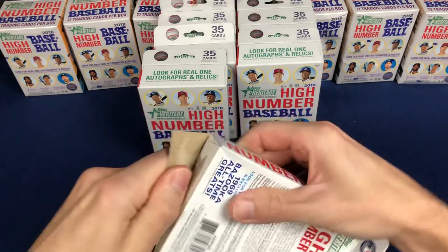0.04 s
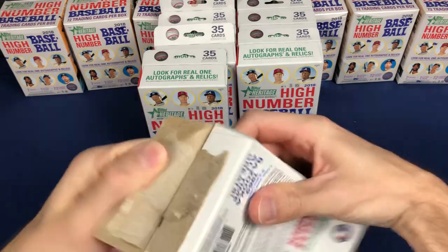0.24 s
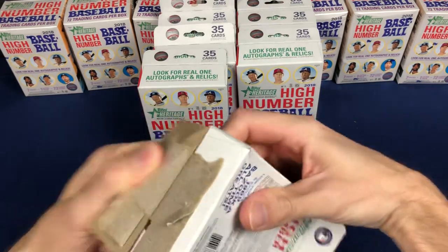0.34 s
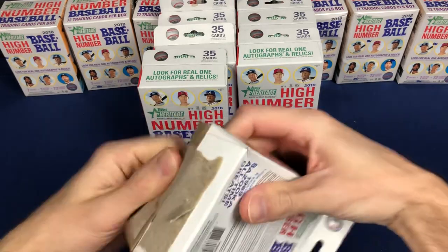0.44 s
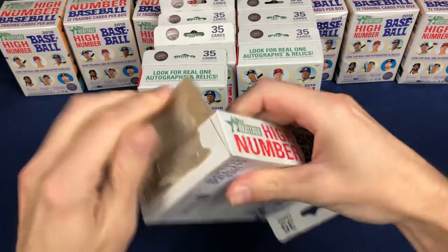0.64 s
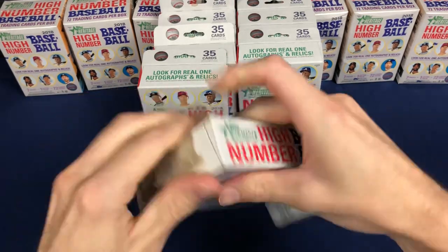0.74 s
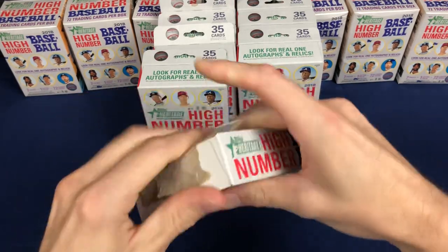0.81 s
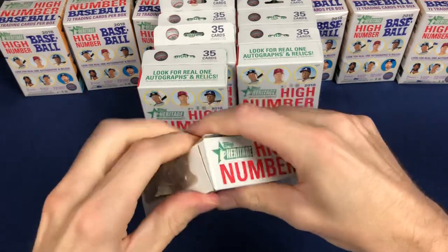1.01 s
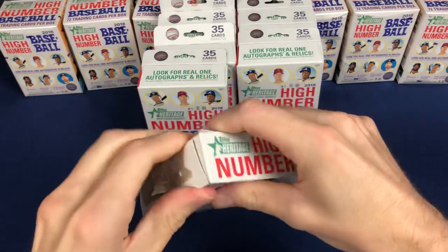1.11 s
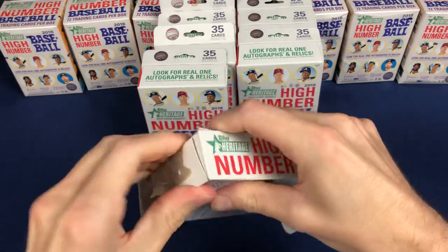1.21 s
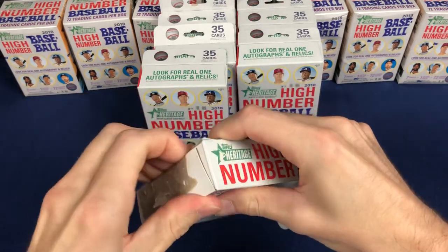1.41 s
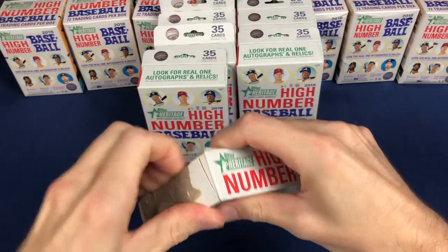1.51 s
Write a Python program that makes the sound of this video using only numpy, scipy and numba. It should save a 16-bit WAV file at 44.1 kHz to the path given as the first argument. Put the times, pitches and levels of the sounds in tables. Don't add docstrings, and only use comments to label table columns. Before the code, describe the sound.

Thin card tears in a loud, brief crackling rip, followed by softer creases, knocks and finger slides

```python
import sys
import numpy as np
from scipy import signal
from scipy.fft import rfft, irfft
from scipy.io import wavfile
from scipy.ndimage import uniform_filter1d
from numba import njit

SR = 44100
rng = np.random.default_rng(int(sys.argv[2]) if len(sys.argv) > 2 else 0)


def file_out(sig):
    cols = np.atleast_2d(sig).T
    lim = np.clip(cols, -1, 1)
    pcm = np.round(lim * 32767).astype(np.int16)
    wavfile.write(sys.argv[1], SR, pcm)


def rack_gain(trim_db):
    fader = np.asarray(trim_db, float)
    return 10 ** (fader / 20)


N = 68355

# [f/Hz, level per Hz/dB]
AIR_SPECTRUM = [(18, -18), (30, 0.5), (199, -11), (632, -19), (889, -2), (3980, -77), (5450, -27),
                (14000, -32), (16000, -44)]
# [loudest moment t/s, rise/s, fall/s, level/dB, centre f/Hz]
SLIDES = [(.0, 0.014, 0.066, -44, 3430), (0.041, 0.032, 0.016, -42.5, 4500),
          (.09, 0.015, 0.087, -48.5, 3380), (.385, 0.053, 0.049, -45.5, 497),
          (0.447, 0.028, 0.13, -45, 3620), (0.523, 0.013, 0.033, -50, 1800), (.53, .02, .03, -54, 9000),
          (.59, 0.035, 0.043, -47.5, 3360), (0.646, 0.038, 0.046, -40, 3450), (.645, .03, .07, -50, 400),
          (.66, .03, .03, -50, 10000), (.725, 0.037, 0.034, -59, 1500), (.775, 0.0082, 0.092, -50, 2460),
          (0.837, 0.0072, 0.0037, -29.5, 4540), (.865, 0.03, 0.08, -50, 5000),
          (.85, 0.14, 0.074, -45, 3730), (0.942, 0.019, 0.023, -37.5, 6200),
          (0.961, 0.0091, 0.024, -43, 5000), (1.002, 0.03, 0.027, -50, 4860),
          (1.046, 0.042, 0.068, -43, 7500), (1.088, 0.026, 0.033, -53, 4500),
          (1.12, .02, 0.018, -52.5, 4000), (1.165, 0.02, 0.066, -54, 3700),
          (1.222, 0.018, 0.008, -42, 3000), (1.25, 0.056, 0.1, -49.5, 2750),
          (1.359, 0.011, 0.075, -64, 3020), (1.474, 0.038, 0.044, -47, 5500),
          (1.505, 0.041, 0.076, -49, 4300)]
# [middle t/s, half length/s, level/dB, f/Hz]
SINGING_FLAPS = [(.008, .015, -57.5, 3380), (0.031, .015, -58.5, 3720), (.255, .03, -37, 3330),
                 (0.45, .03, -49.5, 3550), (0.8384, .005, -35, 3017), (1.132, .003, -51.5, 3400),
                 (0.86, 0.025, -54, 2800), (1.084, 0.011, -58, 1028), (1.263, 0.042, -59.5, 1670),
                 (1.257, 0.05, -57, 2446), (1.493, 0.039, -57, 4930)]
# [t/s, peak level/dB, f/Hz, ring T60/s, push length/s]
PANEL_KNOCKS = [(0.013, -48, 118, 0.04, 0.0059), (0.019, -44, 314, 0.024, 0.016),
                (0.042, -45, 207, 0.024, 0.0045), (0.083, -45, 263, 0.023, 0.004),
                (.09, -48, 463, .02, .008), (0.178, -41.5, 930, .012, 0.0021),
                (0.2129, -34.5, 1753, 0.022, 0.0077), (0.214, -31.5, 920, 0.014, 0.0023),
                (.3155, -35.5, 810, 0.036, 0.0013), (.321, -34, 810, 0.011, 0.00087),
                (0.3268, -20, 1798, 0.011, 0.0023), (.3282, -26, 837, 0.021, 0.0022),
                (0.329, -33, 320, 0.032, .004), (0.34, -34, 368, 0.05, 0.0054),
                (.355, -37.5, 508, 0.028, 0.0035), (0.333, -42.5, 185.5, 0.11, 0.019),
                (0.3428, -31.5, 1102, 0.026, 0.006), (0.457, -44, 327, 0.027, .008),
                (.58, -50, 755, 0.026, 0.0052), (0.586, -41.5, 1114, 0.03, 0.0083),
                (.628, -44, 410, 0.028, 0.0082), (.636, -36.5, 877, 0.018, 0.0068),
                (.646, -44.5, 393, 0.025, .012), (.6715, -47, 860, 0.012, 0.0037),
                (.678, -48, 372, 0.022, 0.0051), (.708, -47, 800, 0.012, .002),
                (.711, -49, 280, 0.023, 0.0046), (0.7427, -28, 780, 0.01, 0.0062),
                (0.743, -39.5, 1720, 0.011, .003), (.769, -44, 855, 0.02, 0.0058),
                (0.7962, -37.5, 233, 0.023, 0.0022), (0.8134, -24, 1010, 0.016, 0.0048),
                (0.815, -46, 158, 0.049, 0.019), (0.8277, -39, 1128, 0.027, 0.0042),
                (0.841, -43.5, 346, 0.064, 0.015), (1.163, -50, 397, 0.014, 0.0037),
                (1.172, -45, 366, 0.026, .004), (1.1725, -44, 760, .01, 0.0022),
                (1.175, -47.5, 560, 0.015, 0.0018), (1.181, -42.5, 723, 0.015, 0.0037),
                (1.2162, -42, 1714, 0.025, 0.0055)]
# [frequency ratio, level/dB]
PANEL_PARTNERS = [(1, 0), (1.11, -11), (.8, -14), (1.6, -13)]
# [t/s, peak level/dB, centre f/Hz, spread/octaves, length/s]
CREASE_SNAPS = [(.0825, -39, 3870, 1.7, 0.004), (.127, -46, 6000, 0.89, 0.0018),
                (.1375, -57, 6000, .6, 0.00092), (.5673, -35.5, 12600, .45, 0.0024),
                (.576, -36.5, 10100, 0.15, 0.0037), (.6705, -29, 1450, 0.86, 0.002),
                (.694, -36, 1600, 0.89, 0.00094), (.7055, -37, 1360, 1.17, 0.0025),
                (.7155, -52.5, 2800, 1.1, 0.0026), (.7385, -45, 4000, 1.5, 0.0027),
                (.7428, -36, 4200, 1.2, 0.0022), (.7675, -34, 5500, 1.1, 0.0015),
                (.7913, -33.5, 5440, 0.64, 0.0014), (.8132, -30, 4500, 0.7, 0.0034),
                (.8158, -23, 5200, 0.34, 0.00087), (.8285, -24.5, 5030, 0.72, .002),
                (.837, -23, 6000, 0.45, 0.0025), (1.1278, -39, 3800, 0.51, .0015),
                (1.149, -42, 5200, 1.1, 0.0017), (1.1595, -41, 5000, 0.52, 0.0021),
                (1.172, -46, 5500, 0.43, 0.0022), (1.183, -47.5, 5000, .8, 0.0016),
                (1.334, -43, 4750, 1, 0.0052), (1.3985, -49, 3500, 2, 0.003),
                (1.4245, -49, 3000, 2.2, 0.003)]
# [t/s, peak level/dB, centre f/Hz, spread/octaves, length/s]
TEAR_SNAPS = [(.1755, -33.5, 10000, 1.2, 0.002), (.192, -30, 9800, 0.4, .0007),
              (.2007, -15, 4500, 1.1, .001), (.2045, -21, 5000, 1.2, .002),
              (.2105, -15.5, 8100, 0.9, 0.0023), (.261, -13, 7000, 0.88, 0.0027),
              (.2685, -30, 4500, 1, .0015), (.2597, -11.5, 8050, 0.35, 0.00038),
              (.2722, -13.5, 8500, 0.54, 0.00046), (.2815, -19, 7400, 0.51, 0.0019),
              (.290, -13.5, 5950, 0.2, 0.00059), (.293, -20, 6100, 0.77, 0.0016),
              (.3028, -18.5, 6540, 1.1, 0.00056), (.3087, -20, 6070, 0.45, 0.0011),
              (.3106, -26, 7500, .4, 0.0015), (.3143, -15, 2800, .9, .0005),
              (.3193, -19.5, 5500, 0.88, 0.00091), (.3262, -2.5, 4960, 0.6, 0.00035),
              (.3263, -4, 10700, 0.2, 0.00038), (.3372, -21, 6000, 0.7, 0.0011),
              (.3398, -12.5, 4420, 1.46, 0.0013), (.3413, -14.5, 3500, 1.57, 0.00076),
              (.3545, -16, 4000, 1, 0.001), (.364, -27.5, 6940, 1.2, 0.0015)]
# [t/s, level/dB, centre of fibre pitch f/Hz]
TEAR_EFFORT = [
    (.165, -58.5, 6950),
    (0.197, -39.5, 8300),
    (0.204, -24.5, 6040),
    (0.222, -32, 7300),
    (0.264, -24.5, 6040),
    (.282, -26, 6460),
    (0.285, -36, 5930),
    (0.343, -33.5, 4630),
    (.39, -52, 4050),
]

AIR_DB, HUM_DB, HUM_HZ, HUM_WIDTH_HZ = -66, -68.5, 122.7, 42
SLIDE_OCTAVES, SLIDE_CYCLES, SLIDE_SCATTER_DB, SLIDE_PATCHY_DB = 1.6, 4.51, 1, 1.3
SLIDE_BODY_DB, SLIDE_BODY_HZ = -9, 334
SING_CYCLES, SING_SPREAD = 13.5, 0.029
SNAP_CYCLES, SNAP_SCATTER_DB = 2.5, 2.5
TEAR_OCTAVES, TEAR_CYCLES, TEAR_SCATTER_DB, TEAR_PATCHY_DB = 0.75, 3.83, 2.8, 1.2
TEAR_AIR_DB, TEAR_AIR_HZ, TEAR_BODY_DB, TEAR_BODY_HZ = -4.5, 11400, -16, 1130
TEAR_LOW_HZ, CARD_LOW_HZ = 156, 72.4
ROOM_T60_S, ROOM_DB, ROOM_LOW_HZ, ROOM_TOP_HZ = 0.24, -13.5, 437, 9000
PANEL_ROOM_DB = -7
MIC_LOW_HZ, MIC_TOP_HZ = 48, 15900


@njit
def ring(n, start, turn, fade, size):
    y = np.zeros(n)
    for k in range(len(start)):
        step = np.exp(-fade[k] + 1j * turn[k])
        swing = 1.5 * size[k] + 0j
        attack_step = np.exp(-turn[k] / 1.5)
        attack = 1.
        for i in range(max(start[k], 0), min(n, start[k] + int(6 / fade[k]))):
            y[i] += swing.imag * (1 - attack)
            swing *= step
            attack *= attack_step
    return y


def grains(t, hz, cycles, size):
    t, hz, cycles, size = (np.ravel(v) * 1. for v in np.broadcast_arrays(t, hz, cycles, size))
    start = (t * SR).astype(np.int64)
    fade = np.log(1000) * hz / (3 * cycles * SR)
    return ring(N, start, 2 * np.pi * hz / SR, fade, size)


def chance(count, scatter_db):
    place, pitch, sign, luck = rng.random((count, 4)).T
    hz = 150 * 115 ** pitch
    scatter = rack_gain(-scatter_db * np.log(1 - .985 * luck))
    return place, hz, np.sign(sign - .5) * scatter * np.sqrt(hz / 4000)


def hump(hz, centre_hz, octaves):
    return np.exp(-(np.log2(hz / centre_hz) / octaves) ** 2 / 2)


def band(x, hz, width_hz):
    return signal.lfilter(*signal.iirpeak(hz, hz / width_hz, fs=SR), x)


def low_cut(x, hz, order=2):
    return signal.sosfilt(signal.butter(order, hz, "high", fs=SR, output="sos"), x)


def walk(rate):
    hold = int(SR / rate)
    levels = np.repeat(rng.standard_normal(N // hold + 1), hold)
    return 0.93 * uniform_filter1d(levels, hold)[:N]


def room_floor():
    f = np.fft.rfftfreq(N, 1 / SR) + 1
    hz, db = np.array(AIR_SPECTRUM).T
    colour = rack_gain(np.interp(np.log(f), np.log(hz), db))
    air = irfft(rfft(rng.standard_normal(N)) * colour, N)
    hum = band(band(rng.standard_normal(N), HUM_HZ, HUM_WIDTH_HZ), HUM_HZ, HUM_WIDTH_HZ)
    return rack_gain(AIR_DB + 2 * walk(2.5)) * air / air.std() + rack_gain(HUM_DB) * hum / hum.std()


def room_tail(sent):
    t = np.arange(SR // 2) / SR
    noise = signal.lfilter(*signal.butter(1, ROOM_TOP_HZ, fs=SR), rng.standard_normal(len(t)))
    tail = low_cut(noise, ROOM_LOW_HZ) * rack_gain(-60 * t / ROOM_T60_S)
    tail = tail * (t > .004)
    return rack_gain(ROOM_DB) * signal.fftconvolve(sent, tail / np.sqrt(np.sum(tail ** 2)))[:N]


def slides():
    place, hz, size = chance(count=30000, scatter_db=SLIDE_SCATTER_DB)
    t = place * N / SR
    body = rack_gain(SLIDE_BODY_DB) * hump(hz, SLIDE_BODY_HZ, 0.51)
    power = 0
    for peak, rise, fall, db, centre in SLIDES:
        swelling = np.exp(-2 * ((peak - t) / rise) ** 2)
        fading = np.exp(-2 * (np.abs(t - peak) / fall) ** 1.12)
        swell = np.where(t < peak, swelling, fading)
        power = power + (rack_gain(db) * swell * (hump(hz, centre, SLIDE_OCTAVES) + body)) ** 2
    size = .5 * size / np.sqrt(np.mean(size ** 2)) * np.sqrt(power)
    return grains(t, hz, SLIDE_CYCLES, size) * rack_gain(SLIDE_PATCHY_DB * walk(82.0))


def singing_flaps():
    middle, half, db, hz = np.array(SINGING_FLAPS).T[:, :, None]
    place, detune, push = np.moveaxis(rng.standard_normal((len(SINGING_FLAPS), 150, 3)), 2, 0)
    size = rack_gain(db) * push * np.sqrt(half * hz / 300)
    return grains(middle + 0.44 * half * place, hz * (1 + SING_SPREAD * detune), SING_CYCLES, size)


def panel_knocks():
    s, db, hz, t60, push = np.array(PANEL_KNOCKS).T[:, :, None, None]
    ratio, partner_db = np.array(PANEL_PARTNERS).T[:, None, :, None]
    pushes = 5
    u = rng.random((len(PANEL_KNOCKS), len(PANEL_PARTNERS), pushes, 2))
    mode_hz = hz * ratio
    late = (np.arange(pushes) + u[..., 0]) / pushes * push
    late = np.round(late * mode_hz) / mode_hz
    detuned = mode_hz * (1 + .025 * (u[..., 1] - .5))
    return grains(s + late, detuned, t60 * hz / 3, rack_gain(db + partner_db - 12 + 3 * u[..., 1]))


def snaps(rows):
    s, db, centre, octaves, length = np.array(rows).T[:, :, None]
    drawn = chance(count=200 * len(rows), scatter_db=SNAP_SCATTER_DB)
    place, hz, size = (v.reshape(len(rows), -1) for v in drawn)
    size = size * np.sqrt(place) * rack_gain(-24 * place) * hump(hz, centre, octaves)
    energy = np.sum(size ** 2 / hz, axis=1, keepdims=True)
    size = size / np.sqrt(energy / (length + 1 / centre))
    return grains(s + 2 * length * place, hz, SNAP_CYCLES, .7 * rack_gain(db) * size)


def tearing_fibres():
    s, db, centre = np.array(TEAR_EFFORT).T
    place, hz, size = chance(count=16000, scatter_db=TEAR_SCATTER_DB)
    t = s[0] + place * (s[-1] - s[0])
    colour = hump(hz, np.interp(t, s, centre), TEAR_OCTAVES)
    colour = colour + rack_gain(TEAR_AIR_DB) * hump(hz, TEAR_AIR_HZ, 1 / 2)
    colour = colour + rack_gain(TEAR_BODY_DB) * hump(hz, TEAR_BODY_HZ, 0.74)
    size = size * colour / np.sqrt(np.mean(size ** 2))
    crackle = grains(t, hz, TEAR_CYCLES, .5 * size * rack_gain(np.interp(t, s, db)))
    return crackle * rack_gain(TEAR_PATCHY_DB * walk(150.0))


def scene():
    tear = low_cut(tearing_fibres() + snaps(TEAR_SNAPS) + snaps(CREASE_SNAPS), TEAR_LOW_HZ)
    rustle = low_cut(tear + slides(), CARD_LOW_HZ)
    panels = low_cut(singing_flaps() + panel_knocks(), CARD_LOW_HZ)
    wet = room_tail(rustle + rack_gain(PANEL_ROOM_DB) * panels)
    return (rustle + panels + wet + room_floor())[None]


def low_pass(x):
    return signal.sosfilt(signal.butter(12, 16480, fs=SR, output="sos"), x)


def record(dry):
    topped = signal.sosfilt(signal.ellip(8, .3, 45, MIC_TOP_HZ, fs=SR, output="sos"), dry)
    mix = low_cut(topped, MIC_LOW_HZ, order=4)
    return low_pass(mix)


dry = scene()
out = record(dry)
file_out(out)
```